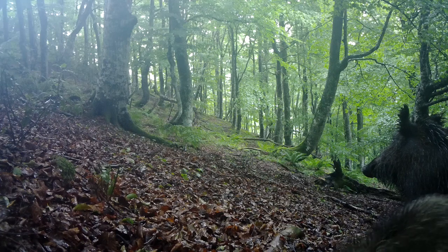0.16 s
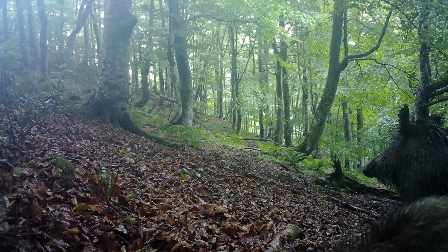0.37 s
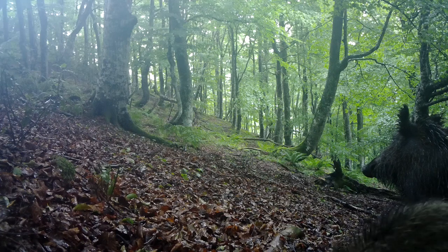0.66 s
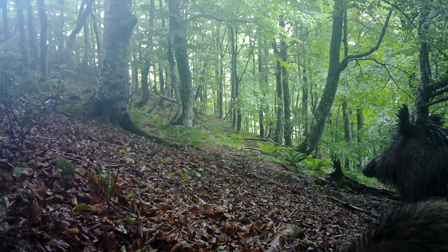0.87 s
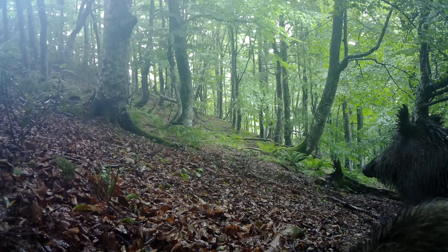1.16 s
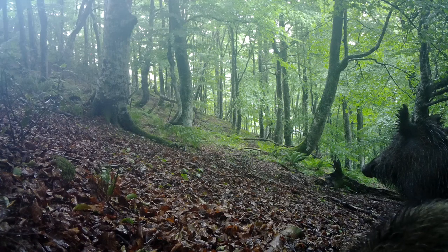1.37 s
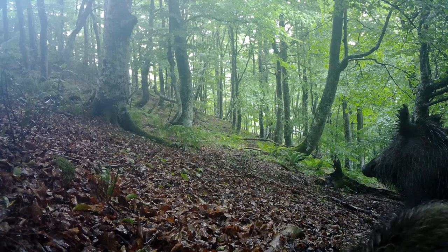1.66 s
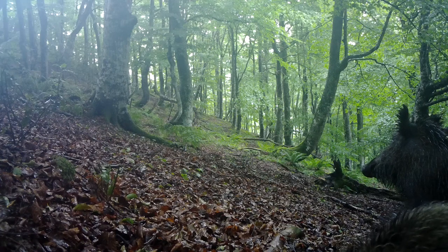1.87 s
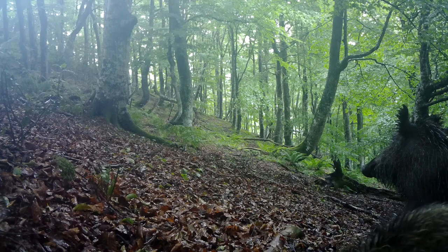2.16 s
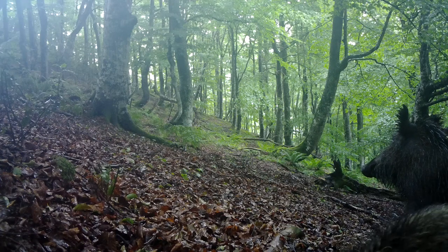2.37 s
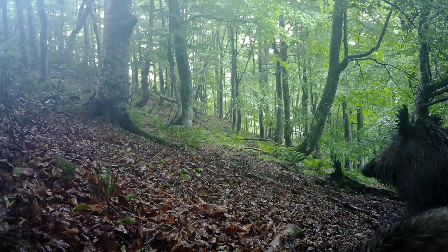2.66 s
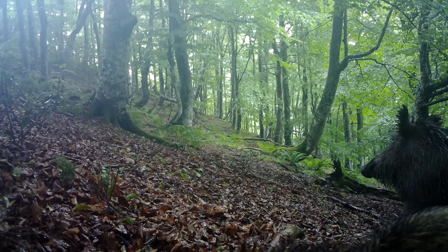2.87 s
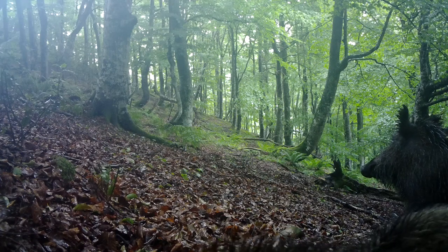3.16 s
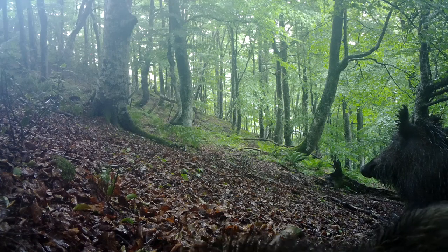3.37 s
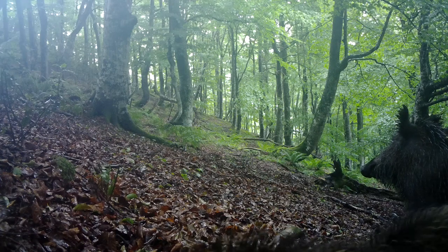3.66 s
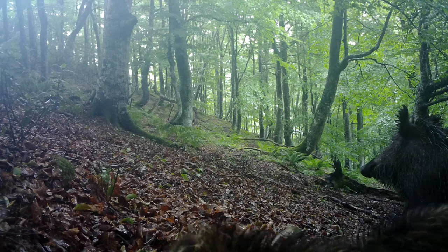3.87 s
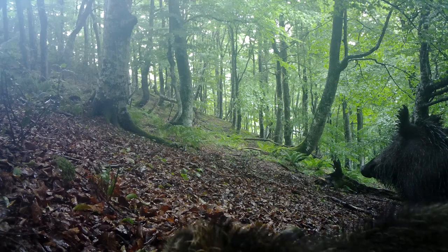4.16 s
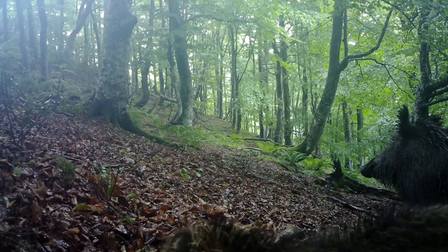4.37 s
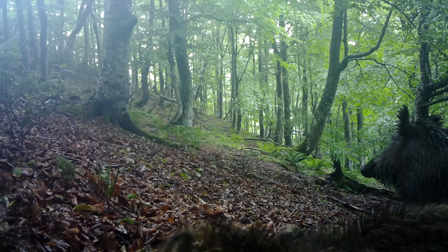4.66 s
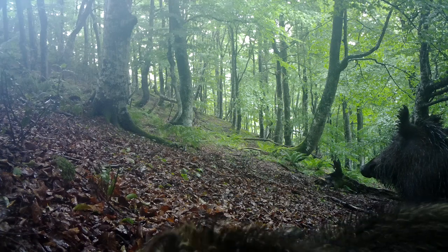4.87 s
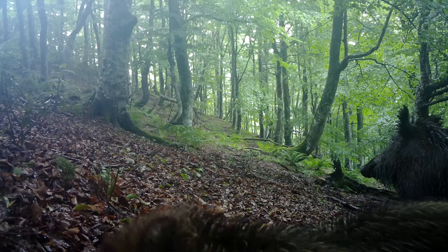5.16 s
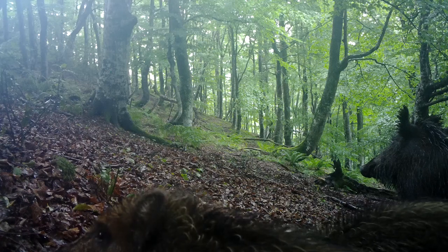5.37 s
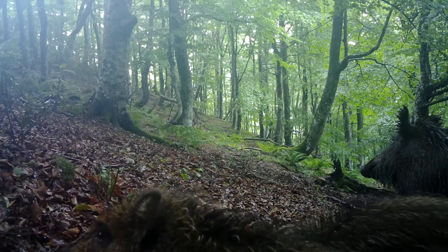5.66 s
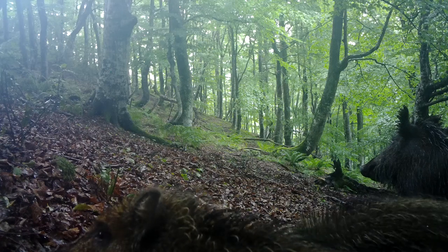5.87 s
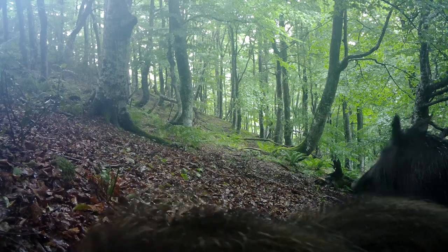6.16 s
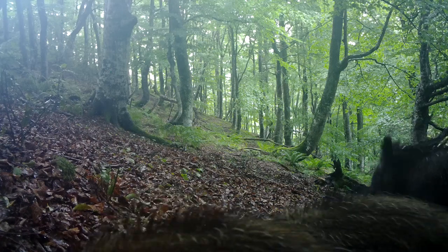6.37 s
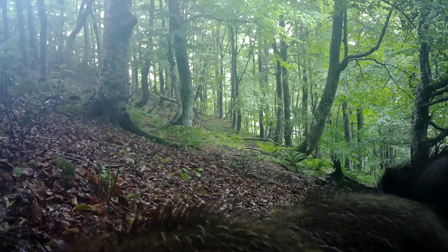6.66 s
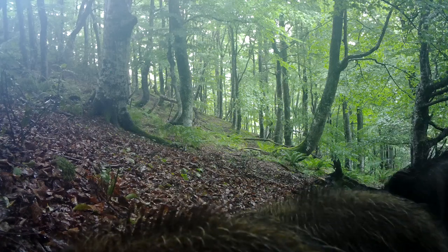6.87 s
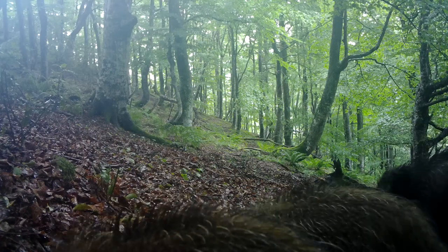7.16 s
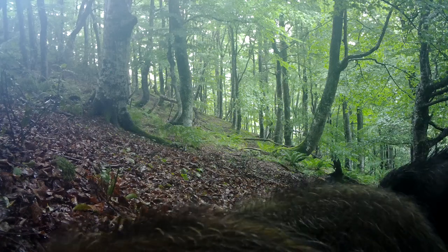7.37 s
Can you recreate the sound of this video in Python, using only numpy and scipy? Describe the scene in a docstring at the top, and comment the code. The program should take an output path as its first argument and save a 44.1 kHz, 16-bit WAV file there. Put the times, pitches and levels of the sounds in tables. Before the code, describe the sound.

Rain hisses and ticks on fallen leaves in a wood, heavy drops smacking nearby as wild boar quietly rustle and step.

```python
"""Steady rain in a beech wood, heard close to the ground: shaped noise for the far wash, struck resonances for the patter.
From the start a low rumble of air wanders in level and wild boar shuffle in the litter, as swells of tiny cracks
and, near 2.05 and 2.6 s, as rises of the lower wash. Big drips from the crowns soon smack on dead leaves: noise
splash, leaf ring and litter tap. Then come bubble plips, as short sine tones, and soft hoof thuds, as bursts of low noise.
Late on, the rumble swells once as a boar moves beside the microphone."""
import sys
import numpy as np
from scipy import signal
from scipy.io import wavfile

SR = 44100
rng = np.random.default_rng(int(sys.argv[2]) if len(sys.argv) > 2 else 0)


def store_wav(level_fs):
    """Save 16-bit WAV to argv[1]."""
    pcm = np.round(np.clip(np.atleast_2d(level_fs), -1, 1) * 32767)
    wavfile.write(sys.argv[1], SR, pcm.T.astype(np.int16))


N = 331632
TIME = np.arange(N) / SR


def from_db(db):
    """Decibels to gain."""
    return 10 ** (np.asarray(db) / 20)


def rms_one(x):
    """Scale to unit rms."""
    return x / np.sqrt(np.mean(x ** 2) + 1e-20)


def in_time(rows):
    """Interpolate each column of a time curve at every sample."""
    time_s, *columns = np.transpose(rows)
    return [np.interp(TIME, time_s, column) for column in columns]


def at_hz(points, hz):
    """Read a spectrum on a log-frequency axis."""
    points_hz, points_db = np.array(points)[:, 0], np.array(points)[:, 1]
    return np.interp(np.log(hz), np.log(points_hz), points_db)


def add(out, start_s, sound):
    """Mix a sound in from start_s, or from 0 if that is negative."""
    i = max(round(start_s * SR), 0)
    out[i:i + len(sound)] += sound[:max(N - i, 0)]


def drift(corner_hz):
    """Slow random curve of rms 1: noise through two equal poles, computed at every 40th sample."""
    step = 40
    pole = np.exp(-2 * np.pi * corner_hz * step / SR)
    noise = rng.standard_normal(N // step + 2002)
    slow = signal.lfilter([1], [1, -2 * pole, pole * pole], noise)[2000:]  # drop the settling
    return np.interp(np.arange(N) / step, np.arange(len(slow)), rms_one(slow))


def band(x, low_hz, high_hz, order=2):
    """Causal Butterworth band-pass."""
    high_hz = min(high_hz, .45 * SR)
    edges_hz = [min(low_hz, high_hz - 1), high_hz]
    return signal.sosfilt(signal.butter(order, edges_hz, "band", fs=SR, output="sos"), x + 1e-18)


def ring(x, hz, t60_s):
    """Damped two-pole resonance, falling 60 dB in t60_s."""
    radius = from_db(-60 / (t60_s * SR))
    angle = 2 * np.pi * hz / SR
    return signal.lfilter([1, 0, -1], [1, -2 * radius * np.cos(angle), radius * radius], x + 1e-18)


def clicks(per_s, spread_db, size):
    """Impacts at random moments, many small and few large."""
    sizes = from_db(spread_db * np.minimum(rng.exponential(1, size), 4.5))
    return (rng.random(size) < per_s / SR) * sizes * rng.choice([-1, 1], size)


def impact(decay, slap):
    """Force of a drop: one spike holds the share slap of the energy, the rest is dying splatter."""
    slap = np.clip(slap, 0, 1)
    splatter = rms_one(rng.standard_normal(len(decay)) * decay)
    force = np.sqrt((1 - slap) / len(decay)) * splatter
    force[0] = np.sqrt(slap)
    return force


def banded_noise(spectrum, patchy_db, count):
    """Noise in bands across a spectrum, each flickering on its own; rms 1."""
    edges_hz = np.geomspace(spectrum[0][0], min(spectrum[-1][0], SR / 2.4), count + 1)
    out, white = 0, rng.standard_normal((2, N))
    for k, (low_hz, high_hz) in enumerate(zip(edges_hz, edges_hz[1:])):
        level_db = at_hz(spectrum, np.sqrt(low_hz * high_hz)) + patchy_db * drift(19.7)
        out = out + band(white[k % 2], low_hz, high_hz) * from_db(level_db)
    return rms_one(out)


def patter(per_s, spread_db, slap, splash_t60_s, ring_cycles, count=20):
    """Each drop slaps and breaks up in a short splash that shakes some of the many leaf resonances; rms 1."""
    # colour of the nearer patter: (resonance [Hz], relative level [dB])
    colour = [(600, -5), (1100, -1), (2000, 0.5), (4000, 5), (6500, 6), (10000, -8), (15000, -3)]
    drops = clicks(per_s * from_db(3 * drift(4)), spread_db, N)
    at, t = np.flatnonzero(drops), np.arange(SR // 40) / SR
    out = np.zeros(N)
    for hz in np.geomspace(650, 14500, count):
        hits = np.zeros(N)
        shaken = rng.standard_normal(len(at)) * (rng.random(len(at)) < .7)
        hits[at] = drops[at] * shaken
        leaf = ring(impact(from_db(-60 * t / splash_t60_s), slap), hz, ring_cycles / hz)
        out += from_db(at_hz(colour, hz)) * rms_one(signal.oaconvolve(hits, leaf)[:N])
    return rms_one(out)


def ticks(per_s, spread_db, slap, t60_s, low_hz, high_hz, count=6):
    """Small drops landing near the microphone: a bright snap and a short fizz of spray; rms 1."""
    out, t = np.zeros(N), np.arange(SR // 20) / SR
    for _ in range(count):
        force = impact(from_db(-60 * t / t60_s), slap)
        out += signal.oaconvolve(clicks(per_s / count, spread_db, N), force)[:N]
    return rms_one(band(out, low_hz, high_hz))


def air_rumble():
    """Air on the microphone: low noise whose level wanders, with one swell as a boar moves past."""
    # colour of the air: (frequency [Hz], relative density [dB per Hz])
    colour = [(18, -1.5), (35, -0.5), (60, -5.5), (100, -5.5), (150, -14), (210, -34.5)]
    rest_db, wander_db, wander_hz = -48.5, 1, 4.3
    start_s, attack_s, hold_s, release_s, swell_db = 6.78, 0.087, 0.17, 0.19, 11
    corners_s = np.cumsum([start_s, attack_s, hold_s, release_s])
    swell = np.interp(TIME, corners_s, [0, 1, 1, 0])
    level_db = rest_db + wander_db * drift(wander_hz) + swell_db * swell
    return from_db(level_db) * banded_noise(colour, patchy_db=-0.5, count=7)


def shuffles(cracks_per_s, spread_db, top_hz):
    """Wet leaves pressed and dragged: a swell of dense tiny cracks."""
    # shuffles in the litter; one that would start before 0 starts at 0:
    # (middle [s], half-length [s], relative level [dB], lower edge [Hz])
    moves = [(0.06, 0.17, -49, 2000), (0.43, 0.084, -39, 1900), (1.388, 0.058, -36, 2800),
             (1.86, .11, -37.5, 900), (1.88, 0.071, -33.5, 3300), (2.451, 0.087, -35.5, 2100),
             (2.63, 0.14, -45, 1700), (3.328, 0.044, -38, 3000), (4.029, .025, -38, 3500),
             (4.995, 0.033, -37.5, 3500), (5.302, .12, -39, 2400), (6.222, 0.1, -35.5, 6560),
             (6.2, 0.0088, -28, 7500), (6.899, 0.073, -34, 950), (7.129, 0.2, -46, 3000)]
    crack_high_hz = 10400
    out = np.zeros(N)
    for middle_s, half_s, level_db, low_hz in moves:
        swell = signal.windows.hann(int(2 * half_s * SR)) ** 2
        cracks = band(clicks(cracks_per_s, spread_db, len(swell)), low_hz, crack_high_hz, order=1)
        add(out, middle_s - half_s, from_db(level_db) * swell * rms_one(band(cracks, 230, top_hz)))
    return out


def lesser_drips():
    """Quieter drips at random moments, as rows like those of the big ones."""
    per_s, mean_db, spread_db = 5, -39, 1.0
    range_hz, range_t60_s, ring_share = (4300, 11000), (.005, 0.026), .3
    rows = []
    for s in np.flatnonzero(rng.random(N) < per_s / SR) / SR:
        splash_hz, leaf_hz, second_hz = np.exp(rng.uniform(*np.log(range_hz), size=3))
        level_db = mean_db + spread_db * rng.standard_normal()
        rows.append((s, level_db, splash_hz, leaf_hz, second_hz, ring_share, rng.uniform(*range_t60_s)))
    return rows


def close_drips(splash_width, ring_cycles, second_db, tap_low_hz, tap_high_hz, spray_db, spray_t60_s, top_hz):
    """A slap and splash, with the brief ring of the struck leaf and a tap of the litter beneath."""
    # big close drips: (time [s], relative level over 5 ms [dB], splash centre [Hz], main leaf ring [Hz],
    # second ring [Hz], energy share of the rings [0-1], splash t60 [s])
    big_drips = [(0.2433, -33.5, 4700, 6800, 4300, .3, 0.02), (0.4898, -23, 4200, 4030, 2800, 0.75, .012),
                 (0.5083, -22, 4730, 1800, 2900, .12, 0.0046), (0.781, -34.5, 6200, 4180, 6400, .3, 0.02),
                 (0.916, -30.5, 5800, 6700, 4400, .25, 0.026),
                 (1.0584, -23.5, 5900, 2170, 4500, .42, 0.013), (1.1362, -34, 3800, 3620, 2100, 0, .005),
                 (1.1994, -35, 10800, 13220, 15000, 0.8, .006), (1.2349, -25, 7200, 7100, 4900, 0.45, .011),
                 (1.5035, -33, 5200, 7460, 6000, 0.7, .017), (1.6377, -33, 5600, 2700, 5700, .35, .015),
                 (1.793, -30.5, 3200, 5800, 4500, 0.6, 0.023), (2.417, -30, 6200, 7500, 6100, 0.5, .032),
                 (2.6231, -28.5, 4600, 2970, 4300, 0.2, .015), (2.8859, -30, 7300, 8350, 6700, 0.9, .009),
                 (2.9396, -33, 5000, 5810, 7600, .1, .017), (3.1362, -29.5, 6000, 5200, 6700, 0.1, .011),
                 (3.1694, -34.5, 4300, 4180, 3000, 0.7, .006), (3.207, -33, 9400, 10700, 14000, .5, .011),
                 (3.357, -32, 9700, 4520, 11300, .35, .006), (3.4426, -30.5, 6800, 5860, 8000, 0, .006),
                 (3.9246, -28, 6800, 4000, 2800, 0.26, 0.0068), (3.9662, -35, 3500, 4910, 1590, 0.7, .007),
                 (4.0184, -30.5, 7100, 8140, 6600, 0, .021), (4.5545, -35, 7100, 7060, 12000, 0.6, .007),
                 (5.2445, -28, 6500, 5560, 4200, 0.06, .025), (5.7709, -30.5, 5200, 2200, 3900, .25, 0.018),
                 (5.8446, -32, 7300, 5900, 4900, 0.7, .012), (7.152, -30.5, 5300, 5900, 4800, 0.7, .022),
                 (7.4539, -30, 9800, 6420, 13600, 0.6, .008)]
    half_slap_s = 0.0042  # a splash with this t60 has half its energy in the slap; longer ones have less
    ring_slap = 0.45  # slap share in the push that sets the leaf ringing
    # the duller the splash, the harder the tap
    base_tap_db, tap_at_hz, tap_db_per_octave = -8.5, 4970, -11.5
    out, t = np.zeros(N), np.arange(SR // 20) / SR
    soften = signal.butter(2, min(top_hz, SR / 2.2), fs=SR, output="sos")
    for s, level_db, splash_hz, leaf_hz, second_hz, share, t60_s in list(big_drips) + lesser_drips():
        share = np.clip(share, 0, 1)
        slap = half_slap_s / (half_slap_s + t60_s)
        decay = from_db(-60 * t / t60_s) + from_db(spray_db - 60 * t / spray_t60_s)
        force, push = impact(decay, slap), impact(decay, ring_slap)
        splash = band(force, splash_hz / splash_width, splash_hz * splash_width, order=1)
        splash = signal.sosfilt(soften, splash)
        # a limp leaf has two heavily damped modes
        main = rms_one(ring(push, leaf_hz, ring_cycles / leaf_hz))
        second = rms_one(ring(push, second_hz, ring_cycles / second_hz))
        leaf = main + from_db(second_db) * second
        # the packed litter answers 0.25 ms later, soft and dull
        tap = np.roll(band(force, tap_low_hz, tap_high_hz), SR // 4000)
        tap_db = base_tap_db + tap_db_per_octave * np.log2(splash_hz / tap_at_hz)
        struck = rms_one(splash) + from_db(tap_db) * rms_one(tap)
        drip = np.sqrt(1 - share) * struck + np.sqrt(share) * rms_one(leaf)
        add(out, s, from_db(level_db) * rms_one(drip) * np.sqrt(.005 / t[-1]))
    return out


def plips():
    """Each bubble trapped in standing water swells and dies within a few cycles of one round tone."""
    # drips that trap a bubble: (time [s], envelope peak [dB], bubble tone [Hz])
    bubbles = [(0.9162, -29, 2060), (0.9556, -26, 2750), (0.9568, -26, 2090), (1.5873, -23.5, 1610),
               (3.655, -32, 2100), (4.504, -32, 2090), (7.4704, -33, 1800)]
    rise_cycles = 1.9
    out, t = np.zeros(N), np.arange(SR // 20) / SR
    for s, level_db, hz in bubbles:
        age = t * hz / rise_cycles
        add(out, s, from_db(level_db) * age * np.exp(1 - age) * np.sin(2 * np.pi * hz * t))
    return out


def thuds(rise_s, width):
    """Soft soil gives a dull, quickly damped knock under a hoof."""
    # soft hoof thuds: (time [s], relative level over the push [dB], centre [Hz])
    hooves = [(1.045, -41, 150), (1.80, -45.5, 280), (1.977, -44, 290), (2.70, -45, 320), (3.238, -44, 310),
              (4.017, -44, 170), (4.125, -42.5, 141), (4.797, -47, 298), (6.879, -44, 346)]
    out, t = np.zeros(N), np.arange(SR // 6) / SR
    push = t / rise_s * np.exp(1 - t / rise_s)
    for s, level_db, hz in hooves:
        knock = rms_one(push * band(rng.standard_normal(len(t)), hz / width, hz * width))
        add(out, s, from_db(level_db) * np.sqrt(np.mean(push ** 2)) * knock)
    return out


def trunks(x, echo_db):
    """Trunks and slope scatter a thin, dull tail."""
    t = np.arange(SR // 2) / SR
    echoes = band(clicks(1500, 2, len(t)), 400, 7000, order=1)
    tail = echoes * from_db(-60 * t / .5) * (t > .004)
    return x + from_db(echo_db) * signal.oaconvolve(x, rms_one(tail) / np.sqrt(len(t)))[:N]


def scene():
    """The wash and nearer rain, the animals, and the low background."""
    # level of the wash: (time [s], lower band: far rain, with boar shuffles near 2.05 and 2.6 s, relative [dB],
    # upper band: rain on the litter, relative [dB])
    wash_levels = [(0.0, -44, -37.5), (0.9, -48, -40), (1.21, -49.5, -38.5), (2.05, -45.5, -39),
                   (2.3, -48.5, -39.5), (2.6, -44, -37.5), (2.89, -49, -40.5), (3.31, -46.5, -39.5),
                   (4.38, -49.5, -40), (5.88, -48.5, -40), (7.12, -48, -37.5), (7.52, -46, -39.5)]
    # colour of the lower band of the wash: (frequency [Hz], relative density [dB per Hz])
    lower_colour = [(650, -5), (900, -2), (1150, 1.5), (1600, -3.5), (2000, 1.5), (2500, -3.5), (3200, -5)]
    # colour of the rain on the litter: (frequency [Hz], relative density [dB per Hz])
    litter_colour = [(1700, -5.5), (2200, -3), (3200, -1.5), (4200, 1), (5600, 0), (8000, -3.5),
                     (10000, -8), (13000, -14), (16000, -22.5)]
    # low murmur of the wood: (frequency [Hz], relative density [dB per Hz])
    wood_colour = [(150, 1), (225, -10), (320, 3), (375, -7.5), (440, 1), (560, -1.5), (660, -7.5),
                   (900, -10.5), (1400, -16)]

    lower_db, litter_db = in_time(wash_levels)
    lower_wash = from_db(lower_db - 1.5) * banded_noise(lower_colour, patchy_db=2.4, count=7)
    hiss = from_db(-1.07) * banded_noise(litter_colour, patchy_db=0.76, count=12)
    fine = from_db(-10.0) * patter(per_s=700, spread_db=2.5, slap=0.58, splash_t60_s=0.0045, ring_cycles=6.5)
    coarse = from_db(-8.5) * patter(per_s=70, spread_db=3.5, slap=0.17, splash_t60_s=0.014, ring_cycles=7.0)
    snaps = from_db(-13) * ticks(per_s=35, spread_db=1.4, slap=0.16, t60_s=0.044, low_hz=5200, high_hz=14600)
    litter_rain = from_db(litter_db) * (hiss + fine + coarse + snaps)

    boar = from_db(-0.4) * shuffles(cracks_per_s=3000, spread_db=4.0, top_hz=11800)
    boar += from_db(-1.5) * thuds(rise_s=0.012, width=1.6)
    drips = from_db(0.83) * close_drips(splash_width=1.54, ring_cycles=26, second_db=-4.5, tap_low_hz=296,
                                        tap_high_hz=2340, spray_db=-25, spray_t60_s=0.049, top_hz=13700)
    near = trunks(drips + plips() + boar, echo_db=-17)
    wood = from_db(-50.5) * banded_noise(wood_colour, patchy_db=2.04, count=12)
    return (lower_wash + litter_rain + near + wood + air_rumble())[None]


def record(dry):
    """Cut the top steeply with an elliptic low-pass."""
    cutoff_hz = 15750
    return signal.sosfilt(signal.ellip(12, .1, 80, cutoff_hz, fs=SR, output="sos"), dry)


dry = scene()
out = record(dry)
store_wav(out)
```